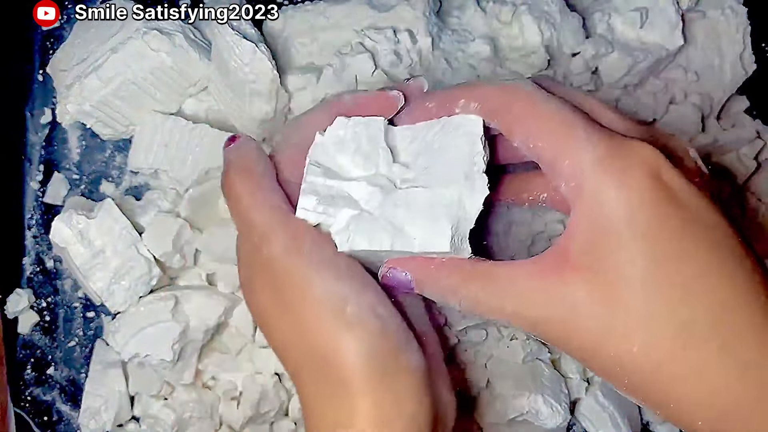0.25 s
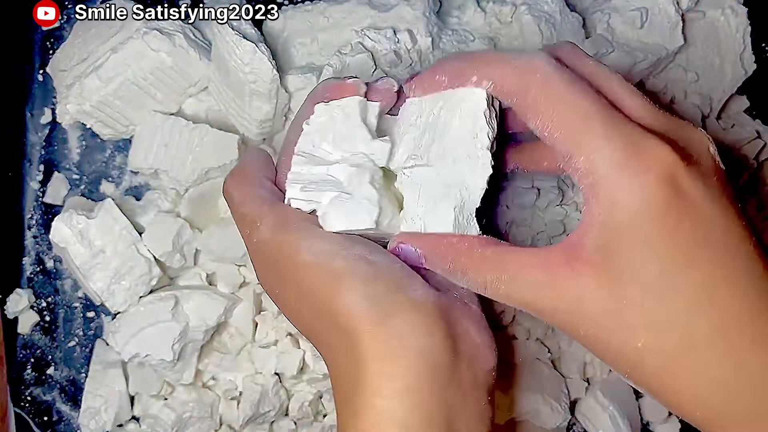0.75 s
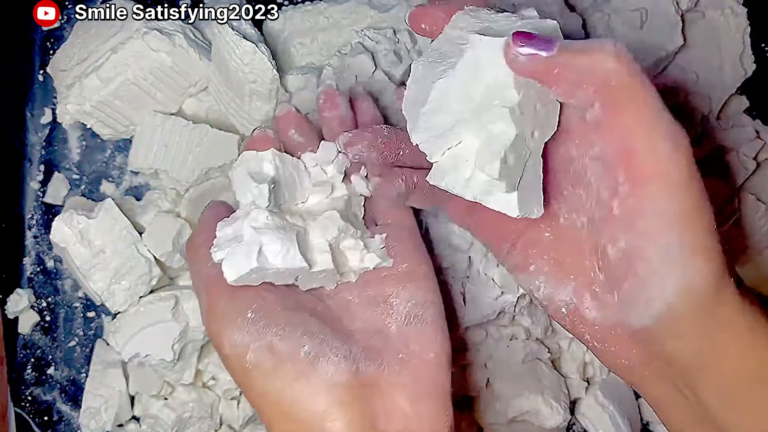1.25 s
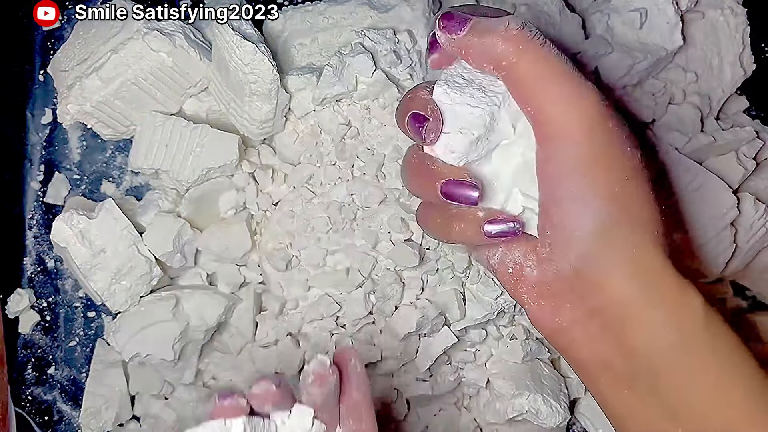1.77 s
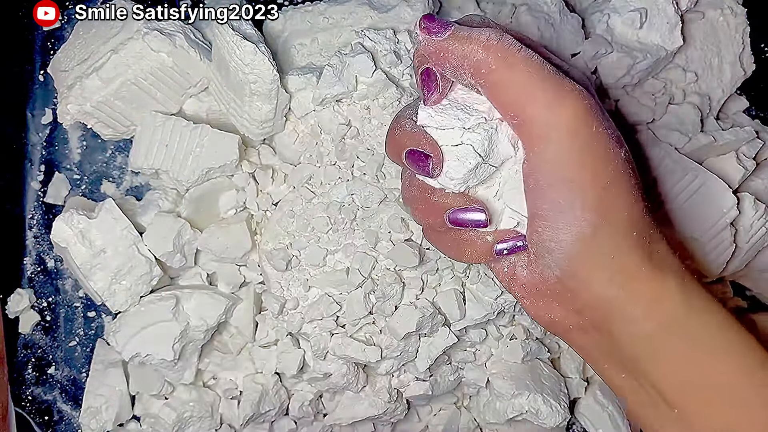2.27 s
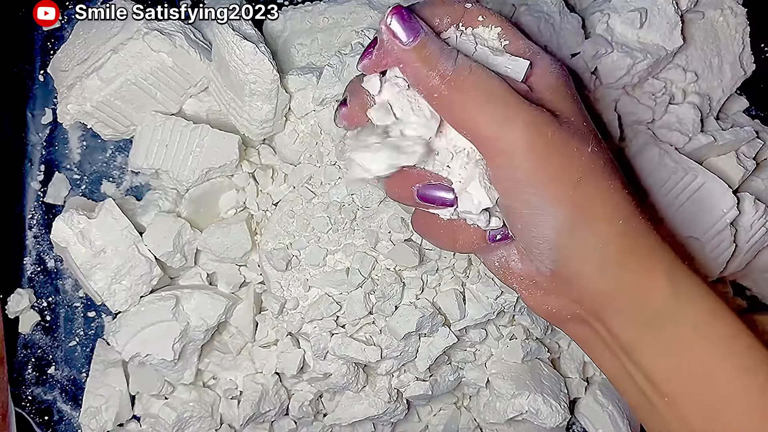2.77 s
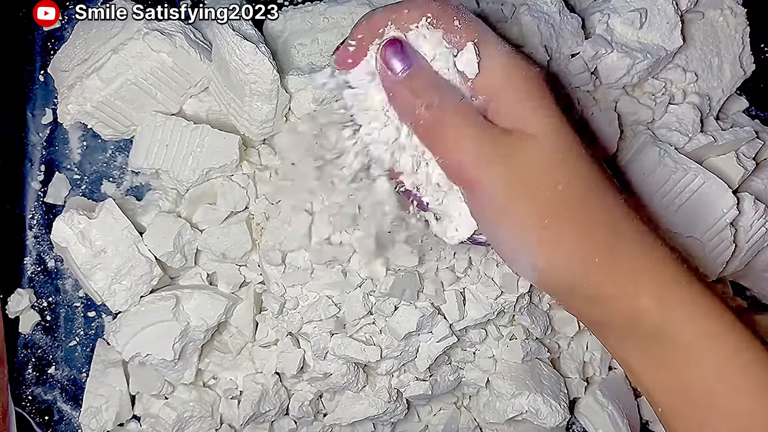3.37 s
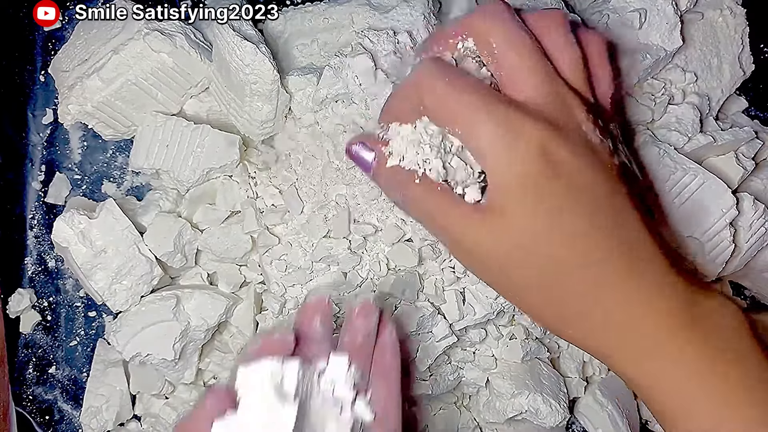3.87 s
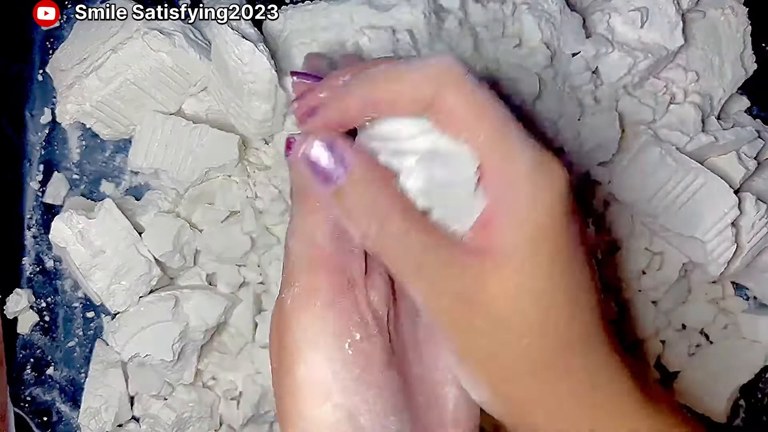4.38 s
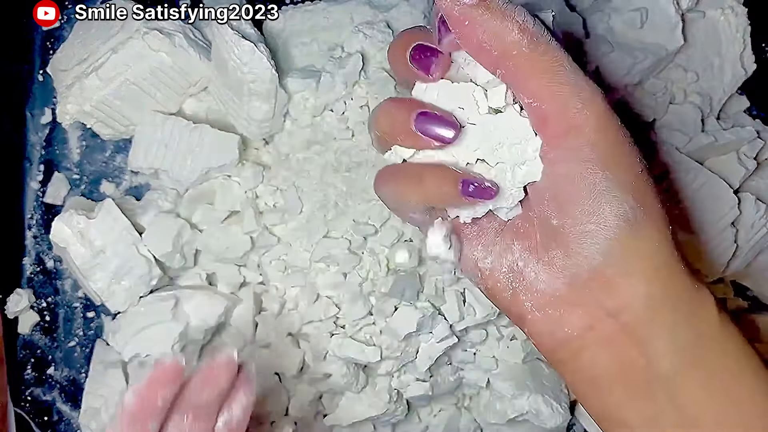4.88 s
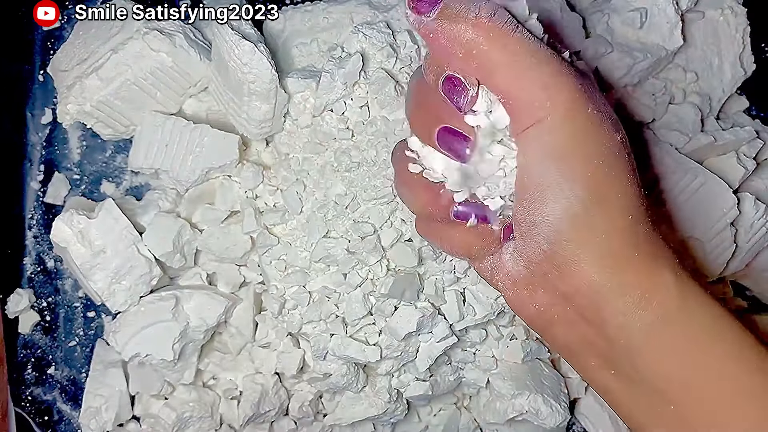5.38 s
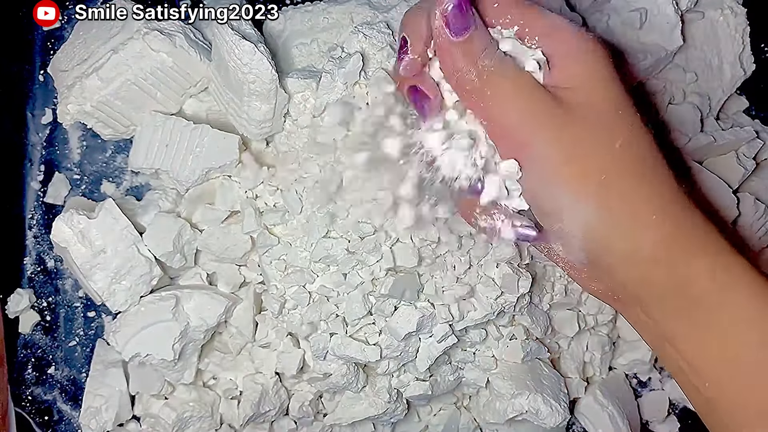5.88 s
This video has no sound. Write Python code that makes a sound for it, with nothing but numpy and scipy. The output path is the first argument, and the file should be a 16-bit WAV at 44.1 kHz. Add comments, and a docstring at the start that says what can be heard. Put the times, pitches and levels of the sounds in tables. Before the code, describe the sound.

Very close stereo pickup in a small quiet room: skin hisses softly over a dry chalk block with a few faint ticks, then it cracks sharply. The fist crushes it in short crunchy bursts, bright and gritty, while crumbs patter and lumps knock on a heap, making the tray boom low. A softer stretch follows, then the strongest crunching.

```python
"""Blocks of dry gym chalk snap and crush in the hands, close to a pair of microphones.
Snaps are jerky noise bursts coloured by the ring of the piece; crumbling is a stream of tiny fractures,
and skin rubbing over the block is a denser, more even stream that hisses.
Lumps and crumbs knock and patter on a heap of rubble and make its tray boom through a few low modes.
Deep rumble and faint air lie behind, in a small quiet room."""
import sys
import numpy as np
from scipy import signal
from scipy.fft import rfft, irfft, next_fast_len
from scipy.io import wavfile
from scipy.ndimage import uniform_filter1d

SR = 44100
rng = np.random.default_rng(int(sys.argv[2]) if len(sys.argv) > 2 else 0)


def materialize(psi):
    """Save the field psi as 16-bit PCM at rate SR to the path in sys.argv[1].

    A 1-D psi becomes a single channel; in a 2-D psi each row is a channel.
    """
    bounded = np.clip(np.atleast_2d(psi).T, -1, 1)
    quanta = np.round(bounded * 32767).astype(np.int16)
    wavfile.write(sys.argv[1], SR, quanta)


N = 270774
TIME = np.arange(N) / SR

# The chalk gives way in the fist. Each row: start in seconds, length in seconds, relative level in dB,
# coarseness in dB (large fragments over fine ones).
SQUEEZES = [(1.608, 0.032, -24.5, -2), (1.667, 0.023, -36, 3), (1.81, 0.059, -31, 3),
            (1.882, 0.046, -30, 12), (2.173, 0.089, -30, 6), (2.228, 0.028, -15, 8),
            (2.459, 0.16, -31.5, 1.5), (2.719, 0.053, -31, 2), (2.786, 0.042, -25, 9),
            (2.866, 0.064, -23.5, 2.5), (2.995, 0.1, -27, 0), (3.133, 0.4, -28, 2), (3.467, 0.11, -29, -14),
            (3.628, 0.072, -25, -2), (3.74, 0.097, -27, -3.5), (3.812, 0.18, -30, -5),
            (4.022, 0.11, -34, -8), (4.16, 0.054, -26.5, 0), (4.231, 0.12, -25, -4),
            (4.429, 0.074, -30.5, -0.5), (4.62, 0.17, -30, -7.5), (4.822, 0.097, -23, -8.5),
            (4.881, 0.12, -23.5, -6), (5.03, 0.086, -26, 2), (5.172, 0.055, -17.5, -2),
            (5.25, 0.066, -15, 3), (5.348, 0.057, -16.5, 4), (5.502, 0.13, -21, 2), (5.671, 0.032, -16, 2),
            (5.745, 0.15, -20.5, -1), (5.87, 0.098, -19, 5), (5.976, 0.099, -23, 2.5),
            (6.11, 0.035, -23.5, 5)]
SQUEEZE_ATTACK_S, SQUEEZE_RELEASE_S = 0.0042, 0.036

# Crumbs pour from the hand onto the heap. Each row: start in seconds, length in seconds,
# relative patter level in dB, relative level of the tray's hum in dB.
POURS = [(2.749, 0.23, -28.5, -13), (3.087, 0.2, -31, 0.5), (3.324, 0.19, -29.5, -6),
         (3.572, 0.4, -29.5, 5), (4.017, 0.18, -33, -9.5), (4.256, 0.068, -26.5, 4.5),
         (4.514, 0.21, -38.5, -4.5), (4.912, 0.056, -30.5, -7), (5.05, 0.11, -30, 6.5),
         (5.254, 0.082, -42, 8), (5.467, 0.19, -29, 6), (5.701, 0.14, -27.5, -1.5),
         (5.854, 0.25, -30.5, -10)]
POUR_ATTACK_S, POUR_RELEASE_S = 0.003, 0.056


def snapping(level_db=0, ring_db=9.5, ring_octaves=0.095, debris_db=-26, debris_s=0.027,
             rise_s=0.00011, jag_db=4):
    """A crack runs in jerks through a piece within milliseconds; the piece rings and sheds a little debris."""
    # The loudest fractures. Each row: time in seconds, relative level in dB, decay time constant in seconds,
    # ring of the piece in Hz, tilt above 1 kHz in dB per octave.
    loud_snaps = [(0.3948, -26, 0.0022, 4730, 0), (0.4122, -21, 0.0031, 2870, -4),
                  (0.6414, -9, 0.0014, 3120, 1), (0.7995, -23.5, 0.0035, 2090, -5.5),
                  (0.9162, -25.5, 0.0035, 3040, -2), (1.0054, -24.5, 0.0014, 7700, -2),
                  (1.046, -33, 0.002, 2300, -8), (1.136, -31, 0.0021, 9400, -2.5),
                  (1.3277, -27.5, 0.0022, 9000, 6), (1.5798, -23.5, 0.0038, 6960, -3),
                  (1.614, -10.5, 0.004, 6320, -3.5), (1.6337, -12, 0.0048, 7700, -4),
                  (1.6535, -13, 0.004, 4550, -1), (1.6925, -13, 0.0014, 3970, 3),
                  (1.715, -9, 0.0016, 4940, -5.5), (1.7912, -17.5, 0.0042, 2000, -2.5),
                  (1.8078, 3, 0.003, 3320, -3), (1.82, -10.5, 0.0021, 1920, -4),
                  (1.8341, -3, 0.0024, 4700, -1), (1.84, -6.5, 0.0031, 1310, -7.5),
                  (1.8425, -6, 0.0043, 680, -2.5), (1.8991, -8, 0.0018, 5500, -0.5),
                  (1.9123, -8.5, 0.0046, 1700, -6.5), (1.9789, -24.5, 0.0053, 2500, -4.5),
                  (2.159, -18.5, 0.001, 1710, -7), (2.2302, -8.5, 0.014, 3100, -1),
                  (2.2419, -4, 0.0064, 4440, -4), (2.2714, -9.5, 0.0083, 3150, -6.5),
                  (2.4792, -10.5, 0.0023, 2580, -3), (2.8414, -10, 0.0019, 2660, -8),
                  (2.8937, -5, 0.002, 3200, -4.5), (3.137, -13.5, 0.0021, 2090, -1),
                  (3.157, -7.5, 0.0048, 2860, -7), (3.3228, -11, 0.0018, 5000, -1),
                  (3.432, -17, 0.0034, 3120, -5.5), (3.4826, -5.5, 0.0012, 2550, -4.5),
                  (3.57, -14, 0.002, 5000, 15), (3.6331, -9, 0.003, 7360, 2),
                  (3.675, -13, 0.0034, 900, -1.5), (3.7432, -10, 0.0059, 4870, 0),
                  (3.779, -13.5, 0.002, 4930, 1), (4.0641, -15.5, 0.0051, 5900, -3),
                  (4.4545, -14, 0.0044, 950, -7.5), (4.5978, -19, 0.0025, 910, -1.5),
                  (4.6376, -20.5, 0.0062, 10500, -2), (4.7232, -20, 0.0046, 3290, -1.5),
                  (4.735, -13.5, 0.0052, 7300, 4), (4.8336, -11.5, 0.0028, 7040, 10),
                  (4.8513, -16, 0.0029, 5430, -5), (4.9203, -6.5, 0.0019, 6860, -1),
                  (4.9791, -4, 0.004, 3060, -1), (5.0311, -9.5, 0.0018, 1920, -2),
                  (5.094, -9, 0.0023, 2920, -3.5), (5.1638, -10, 0.0062, 1940, -1),
                  (5.203, -7.5, 0.0069, 1840, -5), (5.375, -10, 0.0028, 1800, -4),
                  (5.4702, -14.5, 0.0052, 2480, -3), (5.495, -13.5, 0.0057, 2780, -3),
                  (5.6232, -4, 0.0029, 2840, 1.5), (5.6917, -6.5, 0.004, 826, -4),
                  (5.8954, -15.5, 0.022, 2100, -8), (6.0576, -9.5, 0.0039, 5200, -5),
                  (6.0707, -13.5, 0.0027, 1790, -11.5)]
    # Basic colour of a fracture. Each row: frequency in Hz, relative level in dB.
    fracture_spectrum = [(100, -27), (350, -6.5), (600, -8.5), (1000, -6.5), (2000, 3.5), (5000, 7),
                         (9000, 5.5), (13000, 2.5), (16000, -5)]
    out = np.zeros((2, N))
    t = np.arange(3000) / SR
    for s, db, decay_s, ring_hz, tilt_db in loud_snaps + lesser_snaps():
        fall = np.exp(-t / decay_s)
        jerks = gain_of(jag_db * evened(uniform_filter1d(rng.standard_normal(len(t)), size=30)))
        crack = fall * (1 - np.exp(-t / rise_s))
        debris = gain_of(debris_db) * np.exp(-t / debris_s)
        burst = rng.standard_normal((2, len(t))) * jerks * (crack + debris)

        def tone(hz):
            tilt = tilt_db * np.log2(np.maximum(hz, 1000) / 1000)
            return read(fracture_spectrum, hz) + tilt + ring_db * bump(hz, ring_hz, ring_octaves)

        snap = evened(colour(burst, tone, size=512)) * np.sqrt(np.mean(fall ** 2))
        add(out, s, gain_of(db + level_db) * snap)
    return out


def lesser_snaps(count=80, over_db=8, spread_db=2.5, decay_s=0.0027, ring_hz=4070, ring_octaves=0.64,
                 tilt_db=4.5):
    """Random small fractures follow the squeeze of the moment, the higher the brighter; rows as for loud snaps."""
    level = moves(SQUEEZES, SQUEEZE_ATTACK_S, SQUEEZE_RELEASE_S)[0]
    events = scattered(level, SQUEEZES[0][0], spread_db, ring_hz, ring_octaves, count)
    # tilt_db is the tilt gained with each octave of ring
    return [(s, db + over_db, decay_s, hz, tilt_db * np.log2(hz / ring_hz)) for s, db, hz in zip(*events)]


def crumbling(coarse_db=-3, fine_db=-3, dust_db=-10, shared=0.44, clump_db=-1.0, chips_db=-9):
    """Large and fine fragments break in clumps over a hiss of powder; chips click at their own pitch."""
    # Colour of the large fragments. Each row: frequency in Hz, relative level in dB.
    coarse_spectrum = [(150, -17), (500, -6.5), (800, -12.5), (1100, -4), (1450, -4.5), (1850, 2.5),
                       (2450, -2), (3100, 0), (4200, -4), (7000, -4.5), (16000, -60)]
    # Colour of the fine fragments. Each row: frequency in Hz, relative level in dB.
    fine_spectrum = [(500, -50), (2000, 2.5), (3500, 0.5), (5200, 2.5), (7000, 2), (10000, -2.5),
                     (12500, -2.5), (14500, -13.5), (16000, -14.5)]
    level, coarseness_db = moves(SQUEEZES, SQUEEZE_ATTACK_S, SQUEEZE_RELEASE_S)
    # big fractures and powder sound among both the large and the fine fragments
    big_fractures = grains(per_s=600, spread_db=3.0, ring_s=0.00045)
    common = shared * big_fractures + gain_of(dust_db) * rng.standard_normal((2, N))
    large_grains = grains(per_s=550, spread_db=2.5, ring_s=0.00032, low_hz=823, high_hz=4060, tonal=0.43)
    large = shaped(common + 0.25 * large_grains, coarse_spectrum)
    small_grains = grains(per_s=1200, spread_db=3.0, ring_s=0.00052, low_hz=3550, high_hz=11900, tonal=0.61)
    small = shaped(common + 0.3 * small_grains, fine_spectrum)
    chips = grains(per_s=130, spread_db=2.4, ring_s=0.0007, low_hz=1700, high_hz=7000, tonal=1.6)
    flutter = evened(uniform_filter1d(rng.standard_normal(N), size=350))
    clumps = gain_of(clump_db * np.tanh(flutter))
    lean = gain_of(coarseness_db)
    crunch = gain_of(coarse_db) * lean * large + gain_of(fine_db) * small
    crunch /= np.sqrt((1 + lean ** 2) / 2)  # coarseness shifts the colour, hardly the loudness
    return level * clumps * (crunch + gain_of(chips_db) * chips)


def rubbing(level_db=0, attack_s=0.005, release_s=0.015, touch_db=-54.5, treble_hz=4930):
    """Powder shears between skin and block: grains so many and so even that they hiss, brighter in some strokes."""
    # Skin slides over the block. Each row: start in seconds, length in seconds, relative level in dB,
    # lift of the treble in dB.
    strokes = [(0.085, 0.073, -36, -3.5), (0.28, 0.15, -60, 9), (0.385, 0.06, -37.5, -7.5),
               (0.65, 0.18, -33, -4.5), (0.9, 0.019, -29, -8.5), (0.965, 0.017, -33.5, 3.5),
               (1.155, 0.03, -32, 2.5), (1.25, 0.065, -49.5, 10), (1.48, 0.29, -45.5, -1)]
    # Colour of the rubbing skin. Each row: frequency in Hz, relative level in dB.
    skin_spectrum = [(200, -21), (700, -18), (1200, -10), (1800, -4), (3000, -1), (4500, -2), (6500, -1.5),
                     (8500, -3.5), (11000, -2), (13000, -3.5), (16000, -18)]
    level, treble_db = moves(strokes, attack_s, release_s)
    hiss = shaped(grains(per_s=6000, spread_db=4.5, ring_s=0.0016), skin_spectrum)
    treble = signal.sosfiltfilt(signal.butter(2, treble_hz, "high", fs=SR, output="sos"), hiss)
    restless = np.hypot(level, gain_of(touch_db))  # the fingers never rest quite still
    return gain_of(level_db) * restless * (hiss + (gain_of(treble_db) - 1) * treble)


def lumps_landing(knock_db=1, boom_db=5, decay_s=0.0091, centre_db=8, octaves=0.32, rise_s=0.00033,
                  above_db=8, below_db=16, low_hz=190):
    """Each lump, and the block as it breaks, knocks around its own pitch, dull above it, and sets the tray
    booming."""
    # The largest lumps, led by the block itself knocking as it breaks. Each row: time in seconds, relative
    # knock level in dB, centre of the knock in Hz, relative boom of the tray in dB.
    large_lumps = [(0.98, -26, 660, -47), (0.998, -31, 330, -43), (2.479, -22.5, 890, -47),
                   (2.748, -28.5, 372, -62), (2.768, -23.5, 453, -28), (2.843, -14.5, 387, -47),
                   (2.894, -20.5, 450, -26), (3.13, -30.5, 244, -23.5), (3.158, -31, 696, -28),
                   (3.259, -26, 348, -36), (3.322, -16.5, 445, -60), (3.609, -19.5, 460, -35),
                   (3.674, -14, 430, -18), (3.681, -16, 860, -51), (3.839, -25.5, 410, -38),
                   (3.922, -36, 359, -25), (3.969, -21, 403, -39), (4.07, -25, 242, -55),
                   (4.27, -24.5, 312, -36), (4.285, -15.5, 334, -22), (4.336, -21.5, 356, -25),
                   (4.454, -19, 966, -52), (4.54, -30, 376, -40), (4.597, -27.5, 940, -49),
                   (5.028, -13.5, 309, -15.5), (5.202, -23.5, 389, -27), (5.335, -17, 487, -43),
                   (5.362, -20, 377, -48), (5.474, -10.5, 440, -22), (5.694, -6, 437, -20),
                   (5.722, -14.5, 290, -25), (5.784, -17.5, 354, -42), (5.833, -28, 650, -44)]
    knocks, booms = np.zeros((2, N)), np.zeros(N)
    t = np.arange(4000) / SR
    ring = tray_ring()
    fall = np.exp(-t / decay_s)
    for s, db, centre_hz, tray_db in large_lumps + small_lumps():
        burst = rng.standard_normal((2, len(t))) * fall * (1 - np.exp(-t / rise_s))

        def tone(hz):
            dulling = above_db * np.log2(np.maximum(hz / centre_hz, 1))
            thinning = below_db * np.log2(np.maximum(low_hz / (hz + 10), 1))
            return centre_db * bump(hz, centre_hz, octaves) - dulling - thinning

        knock = colour(burst, tone, size=1024)
        knock *= np.linalg.norm(fall) / np.linalg.norm(knock, axis=1, keepdims=True)
        add(knocks, s, gain_of(db + knock_db) * knock)
        add(booms, s, gain_of(tray_db + boom_db) * ring)
    return knocks, booms


def small_lumps(count=30, over_db=3.5, spread_db=6.5, knock_hz=517, octaves=0.94, boom_db=-20):
    """Random small lumps among the crumbs follow the pour of the moment; rows as for large lumps."""
    level = moves(POURS, POUR_ATTACK_S, POUR_RELEASE_S)[0]
    events = scattered(level, POURS[0][0], spread_db, knock_hz, octaves, count)
    return [(s, db + over_db, hz, db + boom_db) for s, db, hz in zip(*events)]


def crumbs_falling(patter_db=-1, boom_db=-2):
    """Crumbs patter dully on the heap and keep the tray humming."""
    # Colour of the heap. Each row: frequency in Hz, relative level in dB.
    heap_spectrum = [(60, -20), (140, 3.5), (200, 1), (260, 1), (320, -0.5), (410, -2), (520, -8),
                     (750, -9), (1100, -17.5), (2000, -24.5), (5000, -23)]
    level, tray_db = moves(POURS, POUR_ATTACK_S, POUR_RELEASE_S)
    crumbs = grains(per_s=400, spread_db=4.5, ring_s=0.00048, low_hz=335.4, high_hz=1370, tonal=0.24)
    patter = shaped(crumbs, heap_spectrum)
    blows = grains(per_s=370, spread_db=3.5, ring_s=0.00027)[0]
    hum = signal.oaconvolve(blows, tray_ring())[:N]
    hum /= np.sqrt(uniform_filter1d(hum ** 2, size=4000) + 1e-9)  # a steady stream keeps it even
    return level * gain_of(patter_db) * patter, level * gain_of(tray_db + boom_db) * hum


def tray_ring(rise_s=0.0037):
    """The tray answers one soft blow with a sum of decaying low modes."""
    # The tray's modes. Each row: frequency in Hz, relative level in dB, time to fall by 60 dB in seconds.
    tray_modes = [(121.2, -2.5, 0.47), (102, -9, 0.19), (196.3, -10, 0.21), (232, -20.5, 0.12),
                  (261.6, -18.5, 0.096)]
    t = np.arange(SR // 2) / SR
    modes = sum(gain_of(db - 60 * t / t60) * np.sin(2 * np.pi * hz * t) for hz, db, t60 in tray_modes)
    return (1 - np.exp(-t / rise_s)) * modes


def hollow(x, width_octaves=0.016):
    """Standing waves between the tray and the hands lift or dip a few narrow bands of the chalk sounds."""
    # Each row: centre in Hz, lift in dB (negative for a dip).
    standing_waves = [(225, 7.5), (263, 9), (422, 0.5), (600, 4), (749, 1.5), (1085, 2.5), (1418, 5),
                      (1750, 2), (3279, 5), (4554, -6), (5131, 1.5)]

    def lift(hz):
        return sum(db * bump(hz, centre_hz, width_octaves) for centre_hz, db in standing_waves)

    return colour(x, lift, size=4096)


def room(x, onset_s=0.0012):
    """A short diffuse tail of noise, each band dying at its own speed."""
    # Each row: frequency in Hz, time to fall by 60 dB in seconds.
    reverb_times = [(100, 0.49), (500, 0.18), (3000, 0.083), (10000, 0.037), (16000, 0.04)]
    hz, t, z = signal.stft(rng.standard_normal((2, SR // 2)), SR, nperseg=256)
    fall = gain_of(-60 * t / read(reverb_times, hz)[:, None])
    tail = signal.istft(z * fall * (1 - np.exp(-t / onset_s)), SR, nperseg=256)[1]
    return signal.fftconvolve(x, tail / np.linalg.norm(tail[0]), axes=1)[:, :N]


def microphones(paths):
    """The left microphone hears one path; the right hears it shifted and blended with the other."""
    # Each row: frequency in Hz, phase in radians by which left leads.
    phase_lead = [(90, 0), (430, -.4), (700, -1.5), (900, -.1), (1400, -.5), (1700, .7), (2150, .3),
                  (2700, -2.5), (3300, -4), (4100, -4.9), (5350, -5.9), (7000, -3.2), (7850, -3.05),
                  (9800, -.1), (10900, .1), (13000, 3.05), (14500, 3.25), (15600, 5.8)]
    # Each row: frequency in Hz, left-right likeness (1 is identical apart from phase and level).
    likeness = [(50, 0.98), (150, 0.81), (400, 0.79), (850, 0.09), (1200, 0.38), (1550, 0.082), (1900, 1),
                (2650, 0.047), (3400, 0.49), (4300, 0.077), (5300, 0.48), (6100, 0.74), (7300, 1),
                (9000, 0.48), (10300, 0.88), (12100, 0.63), (13500, 1), (15200, 0.46)]
    # Each row: frequency in Hz, left minus right in dB.
    balance = [(100, 0.5), (700, -3.5), (1100, -1), (1550, -4), (2000, -1), (3400, -5.5), (4600, -3),
               (6000, 0), (15000, 0.1)]
    size = next_fast_len(N + 4096)
    a, b = rfft(paths, size)
    hz = np.fft.rfftfreq(size, 1 / SR)
    same = np.clip(read(likeness, hz), 0, .995)
    lean = gain_of(read(balance, hz))
    right = (same * a + np.sqrt(1 - same ** 2) * b) * np.exp(-1j * read(phase_lead, hz))
    pair = np.array([lean * a, right]) / np.sqrt((1 + lean ** 2) / 2)
    return irfft(pair, size)[:, :N]


def background(rumble_db=1.0, air_db=-49):
    """Deep rumble of changing level and the faint steady air of the room, both coloured noise."""
    # Each row: time in seconds, relative level of the rumble in dB.
    rumble_level = [(0.0, -47), (0.03, -44), (0.36, -41.5), (0.56, -53.5), (1.09, -39.5), (1.11, -45.5),
                    (2.19, -43), (2.39, -29), (2.65, -54.5), (2.82, -28), (3.01, -31.5), (4.89, -46),
                    (4.98, -36), (5.61, -47), (5.71, -26), (5.76, -42), (6.07, -39), (6.14, -47)]
    # Colour of the rumble. Each row: frequency in Hz, relative level in dB.
    deep_spectrum = [(10, -5), (30, -39), (42, -10), (51, -1), (60, -11), (70, -6), (100, -24.5),
                     (200, -32), (600, -44)]
    # Colour of the air. Each row: frequency in Hz, relative level in dB.
    air_spectrum = [(20, -25), (70, -7.5), (120, 10), (200, -5.5), (350, -4), (600, -14), (1200, -18.5),
                    (3000, -41), (10000, -18), (16000, -40)]
    deep = shaped(rng.standard_normal((2, N)), deep_spectrum, size=8192)
    level = gain_of(rumble_db + np.interp(TIME, *np.transpose(rumble_level)))
    return level * deep + gain_of(air_db) * shaped(rng.standard_normal((2, N)), air_spectrum)


def grains(per_s, spread_db, ring_s, low_hz=2000, high_hz=8000, tonal=0, count=48):
    """Tiny fractures of very unequal size: a noisy tick along two paths, plus a few cycles of own pitch."""
    size = gain_of(spread_db * np.minimum(rng.exponential(1, N), 4.1)) * (rng.random(N) < per_s / SR)
    piece = rng.integers(0, count, N)
    t = np.arange(512) / SR
    # the lower a piece is pitched, the longer its tick
    tick_s = ring_s * np.geomspace(.5, 2, count)[:, None, None]
    ticks = rng.standard_normal((count, 2, len(t))) * np.exp(-t / tick_s)
    cycles = np.geomspace(high_hz, low_hz, count)[:, None, None] * t
    tones = np.sin(2 * np.pi * (cycles + rng.random((count, 2, 1)))) * np.exp(-cycles / 5.3)
    rings = ticks / np.linalg.norm(ticks, axis=2, keepdims=True)
    rings = rings + tonal * tones / np.linalg.norm(tones, axis=2, keepdims=True)
    out = np.zeros((2, N + len(t)))
    for i in np.flatnonzero(size):
        out[:, i:i + len(t)] += size[i] * rings[piece[i]]
    return evened(out[:, :N])


def moves(rows, attack_s, release_s, ease_share=0.032, settle_db=-18, settle_s=0.28):
    """Each move swells, holds, lets go and settles: joint gain, then further columns led by the loudest move."""
    start, length, db, *columns = np.transpose(rows)[:, :, None]
    t = TIME[::32]  # a coarse time grid is enough for gain curves
    # longer moves start more gently: ease_share is seconds of attack added per second of length
    rise = .5 + .5 * np.tanh(.5 * (t - start) / (attack_s + ease_share * length))
    after = np.maximum(t - start - length, 0)
    settle = gain_of(settle_db)  # loose fragments keep shifting after each move
    fall = (1 - settle) * np.exp(-after / release_s) + settle * np.exp(-after / settle_s)
    power = (gain_of(db) * rise * fall) ** 2 + 1e-20
    total = power.sum(0)
    curves = [np.sqrt(total)] + [(c * power).sum(0) / total for c in columns]
    return [np.interp(TIME, t, curve) for curve in curves]


def scattered(level, from_s, spread_db, centre_hz, octaves, count):
    """Chance events from from_s on, about as strong as the gain curve at that moment: times, dB and pitches."""
    place, size, pitch = rng.uniform(-1, 1, (count, 3)).T
    s = from_s + (TIME[-1] - from_s) * (np.arange(count) + 1 + place) / (count + 1)
    db = 20 * np.log10(np.interp(s, TIME, level)) + spread_db * size
    return s, db, centre_hz * 2 ** (octaves * pitch)


def gain_of(db):
    """Decibels to amplitude."""
    return 10 ** (np.asarray(db) / 20)


def evened(x):
    """Scales to rms 1."""
    return x / np.sqrt(np.mean(x ** 2) + 1e-20)


def read(points, hz):
    """A table's value at hz, on a log-frequency axis."""
    f, value = np.transpose(points)
    return np.interp(np.log(hz + 1), np.log(f + 1), value)


def bump(hz, centre_hz, octaves):
    """A bell-shaped resonance of height 1 on a log-frequency axis."""
    return np.exp(-.5 * (np.log2((hz + 1) / centre_hz) / octaves) ** 2)


def colour(x, db_at, size=2048):
    """Causal minimum-phase filter shaped by db_at(Hz); keeps the energy of white noise."""
    log_gain = np.log(gain_of(db_at(abs(np.fft.fftfreq(size, 1 / SR)))))
    taps = np.fft.ifft(np.exp(signal.hilbert(log_gain).conj())).real
    return signal.oaconvolve(x, taps[None] / np.linalg.norm(taps), axes=1)[:, :x.shape[1]]


def shaped(x, spectrum, size=2048):
    """Gives a pair of signals a spectrum, at rms 1."""
    return evened(colour(x, lambda hz: read(spectrum, hz), size=size))


def add(mix, s, sound):
    """Mixes a sound in at s seconds."""
    part = mix[..., max(round(s * SR), 0):][..., :sound.shape[-1]]
    part += sound[..., :part.shape[-1]]


def scene(room_db=-17):
    """Chalk in the hands and on the heap; the tray's boom reaches both microphones alike."""
    patter, hum = crumbs_falling()
    knocks, booms = lumps_landing()
    chalk = hollow(snapping() + crumbling() + rubbing() + knocks + patter)
    return microphones(chalk + gain_of(room_db) * room(chalk) + background()) + hum + booms


def record(dry, edge_hz=15900):
    """Peaks beyond full scale are clipped; then a steep low-pass limits the band."""
    clipped = np.clip(dry, -1, 1)
    low_pass = signal.firwin(401, edge_hz, window=("kaiser", 8), fs=SR)
    return signal.oaconvolve(clipped, low_pass[None], "same")


dry = scene()
out = record(dry)
materialize(out)
```